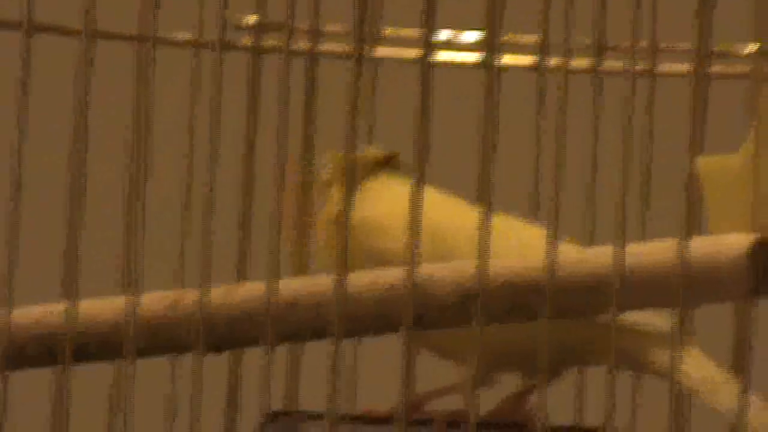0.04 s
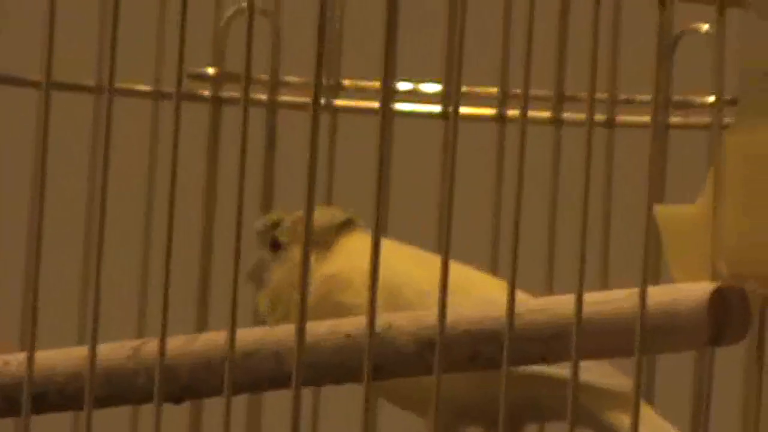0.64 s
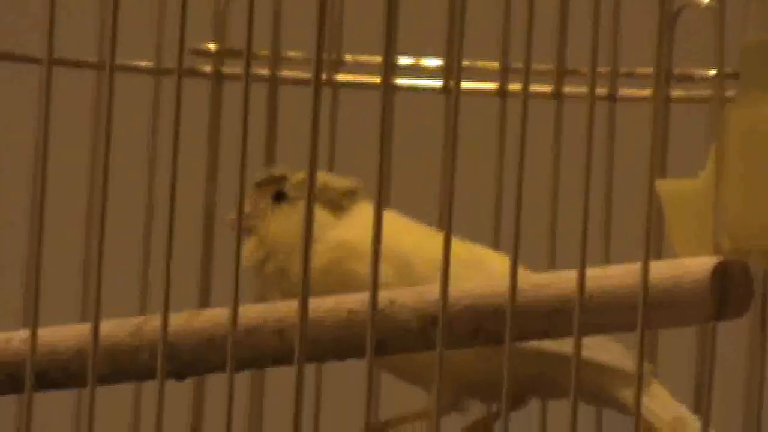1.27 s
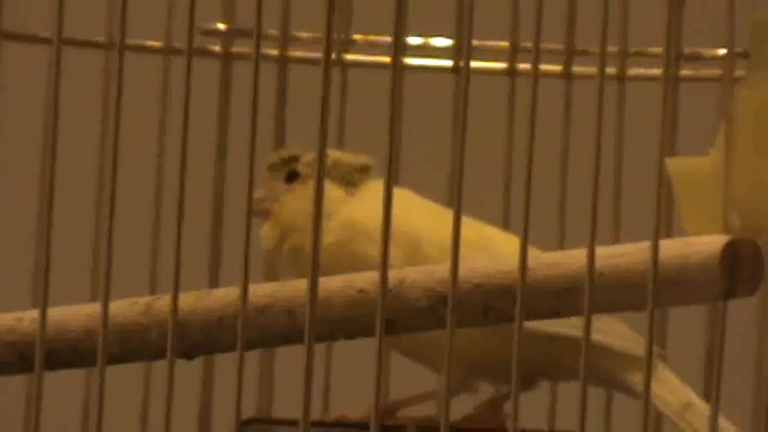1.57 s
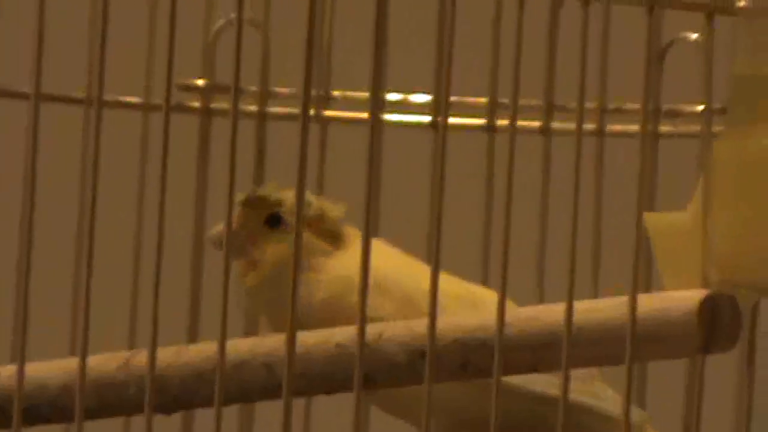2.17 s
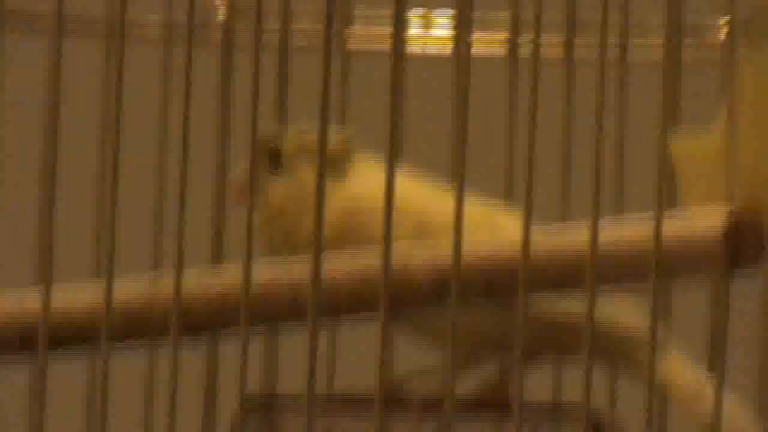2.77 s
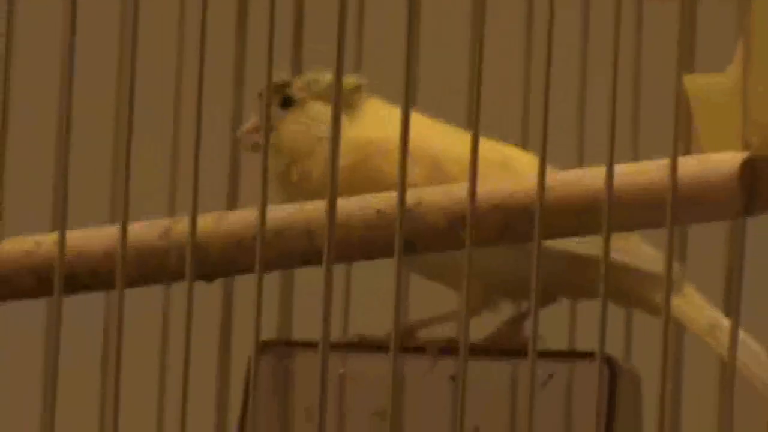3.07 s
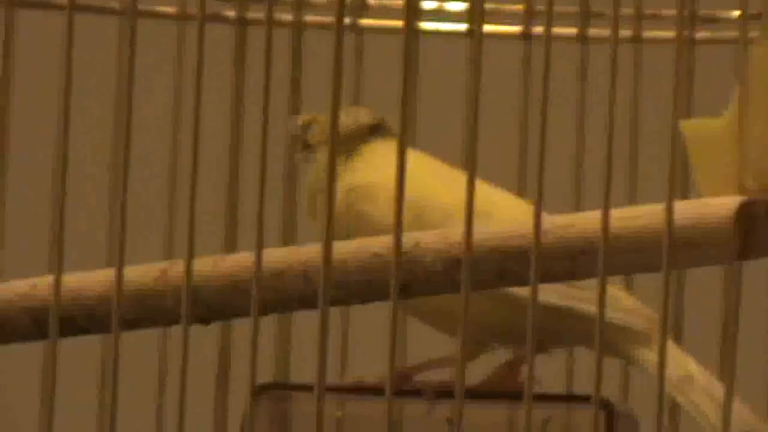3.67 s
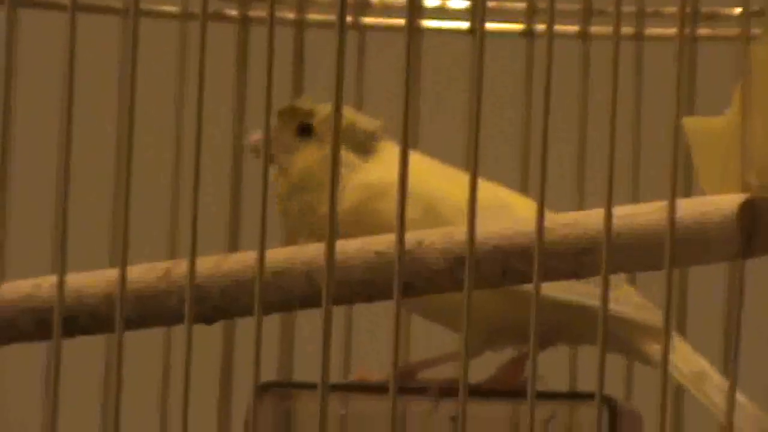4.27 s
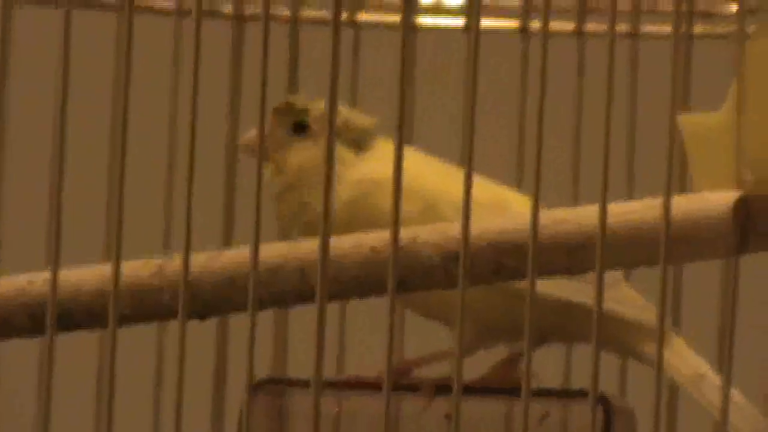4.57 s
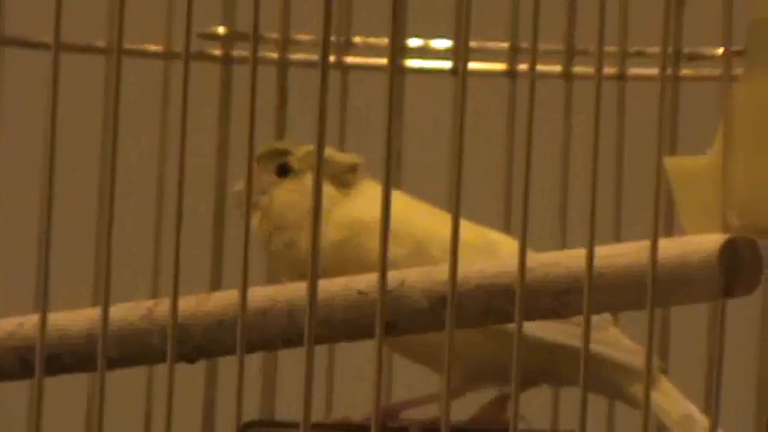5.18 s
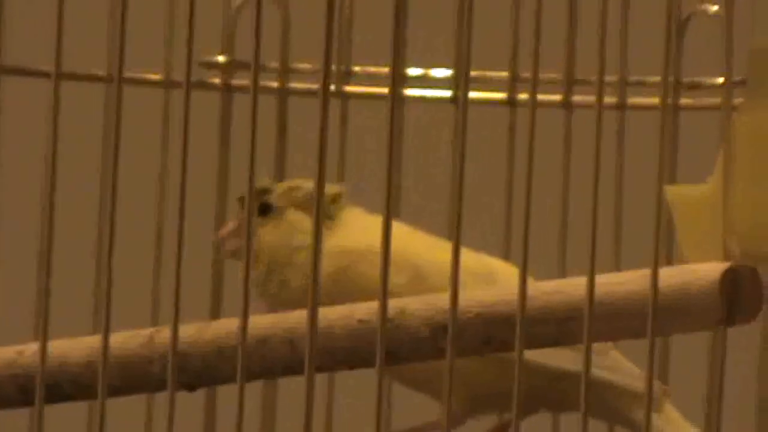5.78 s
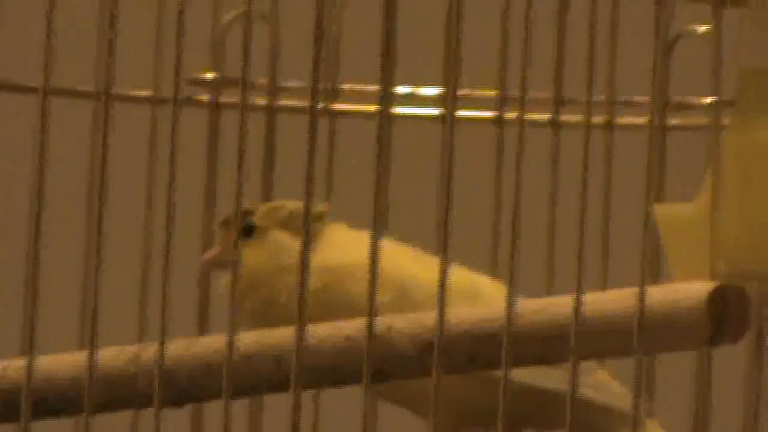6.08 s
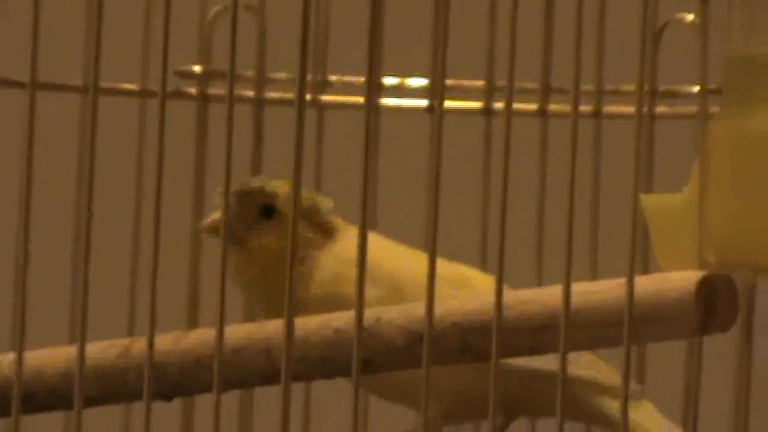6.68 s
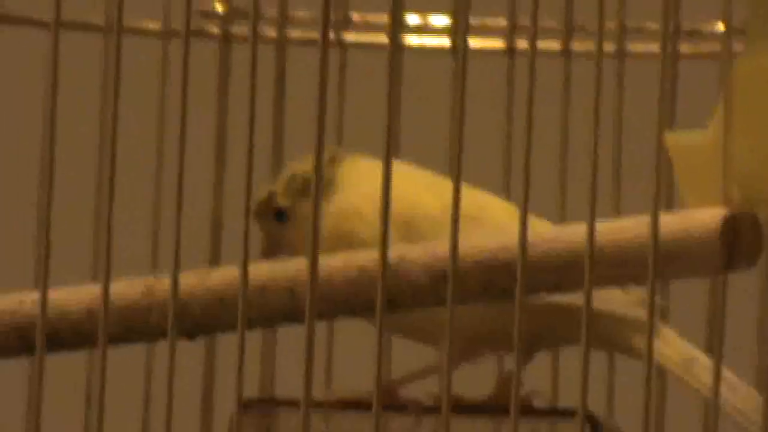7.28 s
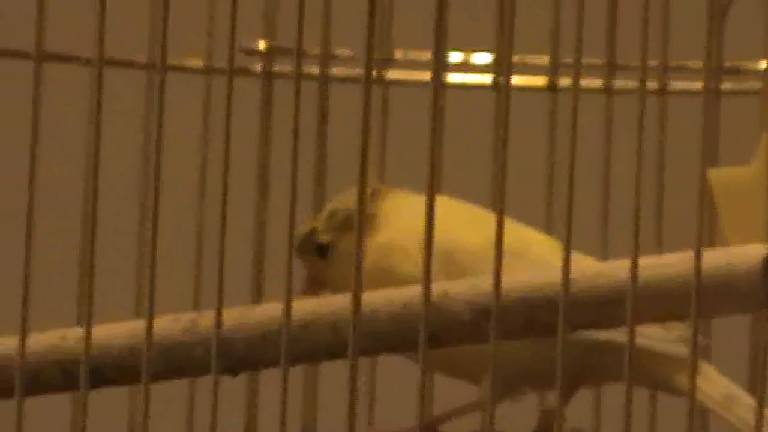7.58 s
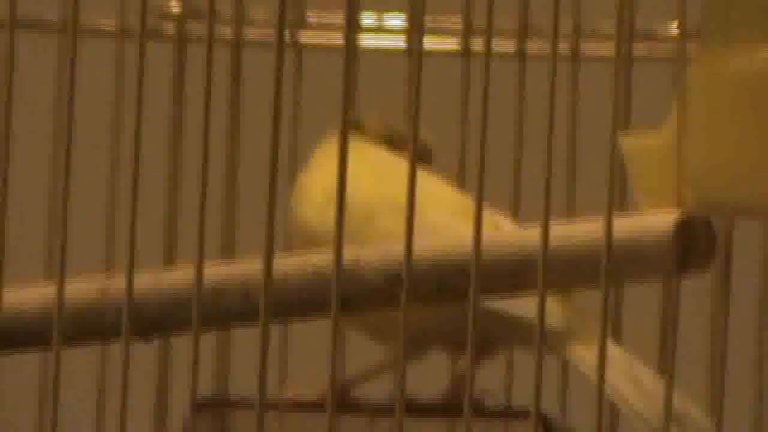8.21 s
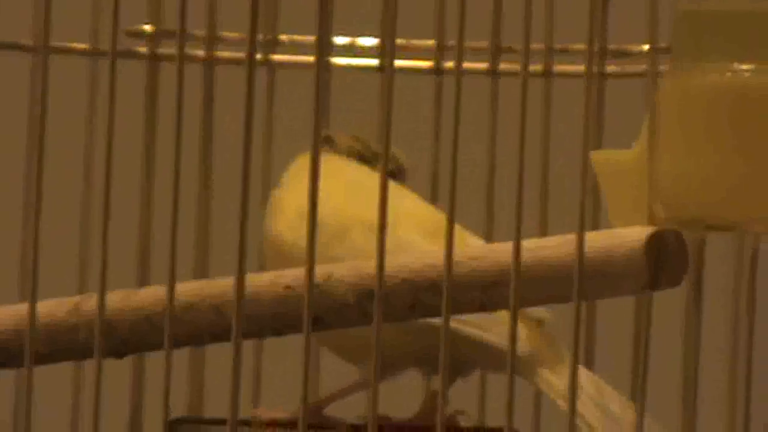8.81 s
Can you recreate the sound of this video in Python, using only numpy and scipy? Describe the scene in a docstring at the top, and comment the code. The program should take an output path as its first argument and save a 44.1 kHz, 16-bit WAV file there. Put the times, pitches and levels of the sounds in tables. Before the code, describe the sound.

Indoors, over a soft appliance hum, a nearby caged canary delivers a rapid trill that gives way to pairs of clear high and low notes, gradually slowing. Quieter birds whistle, chirp and flap further back in the reverberant room. The close singer stops about two thirds of the way through, leaving scattered chirps, a quick wing flutter and finally a distant canary's faint, wavering, falling whistle.

```python
"""A caged canary opens with a fast trill near 4 kHz in a live room, over soft air and appliance hum.
From 2.8 to 6 s it slows into alternating high and low whistles, with a faint thin tone beneath them.
Further off, other cage birds whistle, chirp and flutter their wings, during the song and after it.
At 7.9 s a second canary closes with a falling, pulsing whistle.
Throughout, a small camera close to the cage limits the loudest notes."""
import sys
import numpy as np
from scipy import signal
from scipy.fft import rfft, irfft
from scipy.io import wavfile
from scipy.ndimage import uniform_filter1d, minimum_filter1d

SR = 44100
rng = np.random.default_rng(int(sys.argv[2]) if len(sys.argv) > 2 else 0)


def bounce(signal):
    """Save signal as a 16-bit WAV file at the path given by the first command-line argument."""
    frames = np.transpose(np.atleast_2d(signal))
    limited = np.clip(frames, -1, 1)
    pcm = np.round(limited * 32767).astype(np.int16)
    wavfile.write(sys.argv[1], SR, pcm)


N = 390285
T = np.arange(N) / SR

# room air: freq_hz, density_db
AIR_SPECTRUM = [(25, -1), (60, -2), (110, 0.5), (170, -1.5), (280, -5.5), (420, -7.5), (600, -9.5),
                (1000, -14.5), (2000, -17), (3700, -23), (5500, -26.5), (7000, -35.5), (10000, -37.5),
                (14000, -42.5)]
# appliance hum: freq_hz, level_db
HUM_PARTIALS = [(97.5, -52), (119, -49.5), (242.5, -51), (329, -48.5)]
# diffuse width between two close microphone ports: freq_hz, side_gain_db
DIFFUSE_WIDTH = [(30, -36), (125, -27.5), (250, -22), (700, -8), (2000, -19.5), (4000, -15), (7000, -7),
                 (11000, -9.5)]
# room decay: freq_hz, t60_s
ROOM_DECAY = [(300, 0.72), (4000, 0.6), (8000, 0.43), (13000, 0.22)]
# nearby surfaces: delay_s, gain, port_lag_s
SURFACE_ECHOES = [(.0043, 0.78, .00002), (0.0117, 0.31, -.00002), (0.019, 0.23, .00002),
                  (.031, 0.17, -.00002)]

# Levels below are relative, ahead of trims and mix gains.
# faint thin tone near 2.2-2.4 kHz under the loud whistles: time_s, pitch_hz, level_db
FAINT_TONE = [(2.55, 2338, -57), (3.1, 2327, -55.5), (3.3, 2160, -59), (4, 2150, -58), (5.3, 2157, -57.5),
              (5.5, 2340, -64), (6.1, 2410, -50)]
# feather noise: freq_hz, density_db
FEATHER_SPECTRUM = [(200, -13), (500, -6.5), (1000, -3), (1900, -0.5), (2600, -4), (4000, 0.5),
                    (5600, -2.5), (7500, -12), (11000, -5), (12800, -8.5), (14000, -24)]
# wing flutters: start_s, length_s, level_db, tilt_db_per_octave
WING_FLUTTERS = [(1.667, 0.12, -34, -1), (1.823, 0.062, -23.5, 0.5), (2.702, 0.069, -34, 0),
                 (3.119, 0.082, -39, 0), (6.477, 0.06, -21.5, 0.25), (7.655, 0.096, -37.5, 0),
                 (7.926, 0.023, -44, -4), (8.77, 0.018, -49, 4)]
# other birds' calls: start_s, length_s, open_hz, close_hz, level_db, rasp_ratio
FAR_CHIRPS = [ (1.154, 0.085, 2908, 2870, -50.5, 0.018), (1.393, 0.048, 2870, 2660, -41, 0.0023),
              (1.69, 0.063, 1580, 1745, -36.5, 0.043), (5.366, 0.016, 2400, 2280, -37.5, 0.058),
              (6.105, 0.03, 3475, 3360, -30, 0.093), (6.145, 0.14, 1680, 1804, -38.5, 0.0041),
              (6.269, 0.092, 1840, 2430, -40.5, .01), (6.366, 0.131, 3170, 3261, -29.5, 0.054),
              (6.799, 0.177, 4380, 4456, -49.5, 0.0066), (8.482, 0.084, 3190, 3400, -49, 0.017),
              (8.55, 0.09, 3910, 3980, -43, 0.025), (8.628, 0.082, 4280, 4540, -47, .02),
              (8.732, 0.067, 4080, 4300, -44.5, 0.027)]
# second canary's runs: start_s, end_s, first_period_s, slowing_s_per_note, duty_ratio
RIVAL_RHYTHM = [(0, 1.8, 0.13, 0, .92), (2.024, 3.05, 0.17, .004, 0.5), (3.267, 6.5, .1776, -.0012, .43)]
# pitch of the runs: time_s, pitch_hz
RIVAL_PITCH_HZ = [(.18, 4565), (.25, 4767), (.8, 4780), (1.6, 4727), (2.2, 4520), (2.4, 4706), (2.9, 4764),
                  (3.45, 4507), (4.5, 4530), (5.35, 4576), (5.65, 4735), (6.45, 4580)]
# level of the runs: time_s, level_db
RIVAL_LEVEL_DB = [(.9, -33.5), (1.15, -40.5), (2.15, -40.5), (2.35, -30.5), (3.4, -34), (5.35, -35),
                  (5.9, -30.5), (6.45, -35.5)]
# second canary's closing whistle: time_s, pitch_hz, level_db
RIVAL_CLOSING = [(7.9, 5390, -63), (8.101, 5300, -60), (8.329, 5020, -50), (8.43, 5000, -44.5),
                 (8.7, 4965, -40), (8.85, 5050, -48)]

# near canary's high notes: harmonic, level_db
HIGH_HARMONICS = [(1, 3), (2, -20.5)]
# its low notes and trill: harmonic, level_db
LOW_HARMONICS = [(1, -0.5), (2, -43.5), (3, -33)]
# high note answered by low: start_s, high_length_s, high_close_hz, low_scoop_hz, low_level_db
WHISTLE_PAIRS = [ (2.776, 0.044, 5395, -52, -8), (2.937, 0.043, 5375, -3, -8),
                 (3.095, 0.046, 5517, -38.5, -7.5), (3.257, 0.05, 5315, -41.5, -10),
                 (3.419, 0.054, 5444, -57, -8.5), (3.587, .055, 5350, -52, -8),
                 (3.753, 0.067, 5408, -46, -10.5), (3.954, 0.072, 5305, -91, -10),
                 (4.222, 0.091, 5060, 136.5, -12.5), (4.505, .112, 5066, 302, -13.5),
                 (4.814, 0.11, 5083, 339.5, -13.5), (5.137, .1, 5116, 58.5, -8),
                 (5.448, .1, 5150, 25, -9.5), (5.787, 0.1053, 5193, 60, -8.5)]
# both sides of the syrinx tighten together: high_close_hz, low_close_hz
PITCH_COUPLING = [(5060, 3835), (5175, 3880), (5480, 3930)]
# trill pitch: time_s, pitch_hz
TRILL_PITCH_HZ = [(0, 3856), (.32, 3822), (.54, 3882), (.73, 3996), (1.52, 3994), (1.61, 3928), (2.2, 3963),
                  (2.32, 3920), (2.6, 3959), (2.7, 3885)]
# strength of the trill's flicks: time_s, vigour_ratio
TRILL_VIGOUR = [(.55, 0.54), (.72, 0.8), (1.65, 0.98), (2.1, 0.03)]


def undb(db):
    """Decibels to gain."""
    return 10 ** (np.asarray(db) / 20)


def unit(x):
    """Scale to rms 1."""
    return x / np.sqrt(np.mean(x ** 2))


def curve(points, at):
    """Interpolate a two-column table."""
    return np.interp(at, *np.transpose(points))


def spectrum_at(points, hz):
    """Interpolate on a log-frequency axis."""
    freq_hz, value = np.transpose(points)
    return np.interp(np.log(hz + 1), np.log(freq_hz), value)


def colour(x, points, tilt_db_per_octave=0):
    """Filter by a spectrum, tilted about 3 kHz."""
    hz = np.fft.rfftfreq(len(x), 1 / SR)
    octaves = np.log2((hz + 1) / 3000)
    return irfft(rfft(x) * undb(spectrum_at(points, hz) + tilt_db_per_octave * octaves), len(x))


def wander(rate_hz, size):
    """Smooth random signal, rms near 1."""
    step = max(int(SR / rate_hz), 1)
    stairs = np.repeat(rng.standard_normal(size // step + 2), step)
    return unit(uniform_filter1d(stairs, step))[:size]


def add(track, start_s, sound):
    """Mix a sound in at start_s."""
    i = max(int(start_s * SR), 0)
    track[i:i + len(sound)] += sound[:max(N - i, 0)]


def gate(size, attack_s, release_s):
    """Rounded rise and fall."""
    t = np.arange(size) / SR
    ramp = np.clip(np.minimum(t / attack_s, t[::-1] / release_s), 0, 1)
    return np.sin(np.pi / 2 * ramp) ** 2


def beats(start_s, end_s, period_s, slowing_s):
    """Yield (start_s, period_s); the period changes by slowing_s per note."""
    while start_s < end_s and period_s > 0:
        yield start_s, period_s
        start_s, period_s = start_s + period_s, period_s + slowing_s


def slur(length_s, open_hz, close_hz, settle=2.966, bow=0):
    """Pitch glide, quick then settling; bow > 0 arches it, bow < 0 sags it."""
    u = np.linspace(0, 1, int(length_s * SR))
    hz = open_hz + (close_hz - open_hz) * np.expm1(-settle * u) / np.expm1(-settle)
    return hz * (1 + bow * (np.sin(np.pi * u) - .5))


def quaver(hz, harmonics, jitter, jitter_hz=300, grit=0.03):
    """Nearly pure tone, trembling pitch, trace of roughness."""
    phase = 2 * np.pi * np.cumsum(hz * (1 + jitter * wander(jitter_hz, len(hz)))) / SR
    tone = sum(undb(db) * np.sin(k * phase) for k, db in harmonics)
    roughness = uniform_filter1d(wander(1100, len(hz)), size=24)
    return np.sqrt(2) * tone * (1 + grit * roughness)


def ports(mid, side):
    """Diffuse sound at the left and right ports."""
    side = colour(side, DIFFUSE_WIDTH)
    return np.array([mid + side, mid - side])


def room(x, build_s=0.0024):
    """Diffuse room tail, shorter in the treble."""
    t = np.arange(SR) / SR
    hz = np.fft.rfftfreq(SR, 1 / SR)
    tails = np.zeros((2, SR))
    noise = rfft(rng.standard_normal((2, SR)))
    for centre_hz, t60_s in ROOM_DECAY:
        band = spectrum_at([(f, f == centre_hz) for f, _ in ROOM_DECAY], hz)
        tails += irfft(noise * band, SR) * np.exp(-np.log(1000) * t / t60_s)
    tails *= -np.expm1(-t / build_s)
    tails /= np.sqrt(np.sum(tails[0] ** 2))
    return signal.fftconvolve(ports(*tails), x[None], axes=1)[:, :N]


def echoes(x):
    """Reflections off nearby surfaces reach the two ports slightly apart."""
    out = np.zeros((2, N))
    for delay_s, gain, lag_s in SURFACE_ECHOES:
        for port, side in enumerate((1, -1)):
            out[port] += gain * np.interp(T - delay_s - side * lag_s / 2, T, x, left=0)
    return out


def room_air(level_db=-38.2):
    """Soft, steady, bass-heavy noise."""
    mid, side = (unit(colour(rng.standard_normal(N), AIR_SPECTRUM)) for _ in range(2))
    return undb(level_db) * ports(mid, side)


def appliance_hum(waver_db=2, waver_rad=0.66):
    """Low partials wavering in level and phase."""
    out = np.zeros(N)
    for hz, level_db in HUM_PARTIALS:
        amplitude = np.sqrt(2) * undb(level_db + waver_db * wander(5, N))
        out += amplitude * np.sin(2 * np.pi * hz * T + waver_rad * wander(4.5, N))
    return out


def held_tone(points, jitter):
    """One pure, held, gliding tone."""
    time_s, pitch_hz, level_db = np.transpose(points)
    envelope = undb(np.interp(T, time_s, level_db, left=-120, right=-120))
    return envelope * quaver(np.interp(T, time_s, pitch_hz), [(1, 0)], jitter)


def flutters(beat_hz=26, depth=0.62, patchy_db=3):
    """Feathers brush the air in quick wingbeats."""
    out = np.zeros(N)
    for start_s, length_s, level_db, tilt in WING_FLUTTERS:
        size = int((length_s + 0.016) * SR)
        wingbeats = 1 - depth * np.cos(2 * np.pi * beat_hz * np.arange(size) / SR)
        noise = rng.standard_normal(size) * undb(patchy_db * wander(600, size))
        brush = unit(colour(noise, FEATHER_SPECTRUM, tilt))
        add(out, start_s, undb(level_db) * brush * wingbeats * gate(size, .022, .025))
    return out


def chirps(trim_db=-1):
    """Calls from across the room; fast pitch jitter makes some raspy."""
    out = np.zeros(N)
    for start_s, length_s, open_hz, close_hz, level_db, rasp in FAR_CHIRPS:
        hz = slur(length_s, open_hz, close_hz, settle=1.5)
        tone = quaver(hz, [(1, 0)], jitter=rasp, jitter_hz=620)
        add(out, start_s, undb(level_db + trim_db) * gate(len(hz), 0.004, 0.005) * tone)
    return out


def rival_canary(arch=.008, pulse_hz=8, pulse_depth=0.38):
    """A far canary: runs of wavering notes, later a falling, pulsing whistle."""
    pulse = 1 + pulse_depth * np.sin(2 * np.pi * pulse_hz * T)
    out = held_tone(RIVAL_CLOSING, jitter=0.0082) * pulse
    for *rhythm, duty in RIVAL_RHYTHM:
        for start_s, period_s in beats(*rhythm):
            size = int(duty * period_s * SR)
            hump = np.hanning(size)
            hz = curve(RIVAL_PITCH_HZ, start_s + np.arange(size) / SR) * (1 + arch * (hump - .5))
            level_db = curve(RIVAL_LEVEL_DB, start_s + duty * period_s / 2)
            tone = quaver(hz, [(1, 0), (2, -37.5)], jitter=0.0068, jitter_hz=150)
            add(out, start_s, undb(level_db) * hump ** 0.23 * tone)
    return out


def canary_whistles(fall_hz_per_s=1900, lead_s=.008, gap_s=.016, low_extra_s=.03, low_trim_db=0.53):
    """The two sides of the syrinx alternate: high notes dip and curl up, low notes arch."""
    out = np.zeros(N)
    for start_s, length_s, high_hz, scoop_hz, low_db in WHISTLE_PAIRS:
        hz = slur(length_s + lead_s, high_hz + fall_hz_per_s * length_s, high_hz, bow=-.013)
        high_db = -14.5 - 3.5 * np.log2(length_s / .04)  # longer notes are weaker
        high = gate(len(hz), .038, .014) * quaver(hz, HIGH_HARMONICS, jitter=0.0059)
        add(out, start_s - lead_s, undb(high_db) * high)

        low_hz = curve(PITCH_COUPLING, high_hz)
        hz = slur(length_s + low_extra_s + lead_s, low_hz - scoop_hz, low_hz, bow=0.0099)
        low = gate(len(hz), .021, .03) * quaver(hz, LOW_HARMONICS, jitter=0.0042)
        add(out, start_s + length_s + gap_s - lead_s, undb(low_db + low_trim_db) * low)
    return out


def canary_trill(base_rise=0.0083, vigour_rise=0.02, flick=0.0066, sag=0.21, scatter=0.38,
                 start_db=-7.5, fade_db_per_s=1.3, uneven_db=1.4):
    """Rising syllables of two flicks, air pressure sagging between; they flatten as the trill slows."""
    out = np.zeros(N)
    for start_s, period_s in beats(start_s=0, end_s=2.72, period_s=.0536, slowing_s=.00134):
        rise_draw, level_draw = rng.standard_normal(2)
        level_db = start_db - fade_db_per_s * start_s + uneven_db * level_draw
        length_s = 0.69 * period_s
        u = np.linspace(-.5, .5, int(length_s * SR))
        flick_rad = 2 * np.pi * 2 * u
        vigour = curve(TRILL_VIGOUR, start_s)
        rise = (base_rise + vigour * vigour_rise) * (1 + scatter * rise_draw)
        contour = 1 + rise * u - vigour * flick * np.sin(flick_rad)
        hz = curve(TRILL_PITCH_HZ, start_s + length_s / 2) * contour
        pressure = gate(len(u), 0.0065, 0.013) * (1 - vigour * sag * np.cos(flick_rad))
        add(out, start_s, undb(level_db) * pressure * quaver(hz, LOW_HARMONICS, jitter=0.0038))
    return out


def scene(near_direct_db=-6.5, near_room_db=-4, far_direct_db=-7, far_room_db=-2):
    """Near canary: direct, off nearby surfaces, through the room. Other birds, faint tone: mostly room."""
    song = canary_trill() + canary_whistles()
    others = rival_canary() + held_tone(FAINT_TONE, jitter=0.0044) + chirps() + flutters()
    near = undb(near_direct_db) * (song + echoes(song)) + undb(near_room_db) * room(song)
    far = undb(far_direct_db) * others + undb(far_room_db) * room(others)
    return near + far + room_air() + appliance_hum()


def record(dry, ceiling_db=-6.5, hold_s=0.029, bend=0.036, top_hz=14100):
    """Peak limiter, slight square-law microphone distortion, steep treble cut."""
    hold = int(hold_s * SR)
    peak = -minimum_filter1d(-np.abs(dry).max(axis=0), hold)
    limited = dry * uniform_filter1d(np.minimum(1, undb(ceiling_db) / peak), hold)
    highpass = signal.butter(2, 500, "highpass", fs=SR, output="sos")
    lowpass = signal.ellip(12, .2, 90, top_hz, fs=SR, output="sos")
    distortion = bend * signal.sosfilt(highpass, limited ** 2)
    return signal.sosfilt(lowpass, limited + distortion)


dry = scene()
out = record(dry)
bounce(out)
```